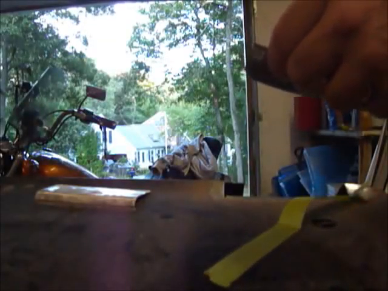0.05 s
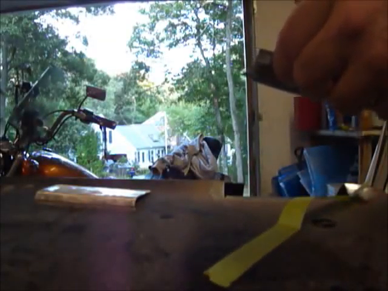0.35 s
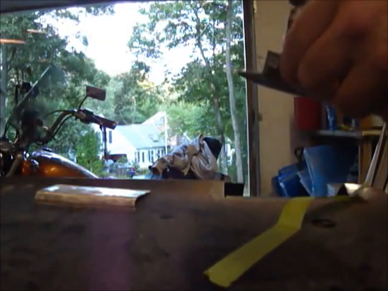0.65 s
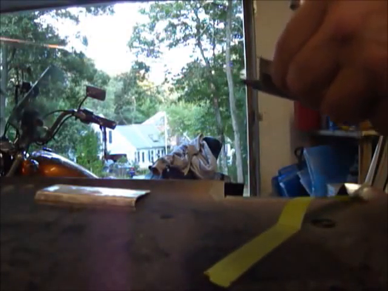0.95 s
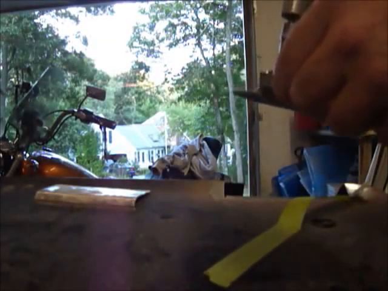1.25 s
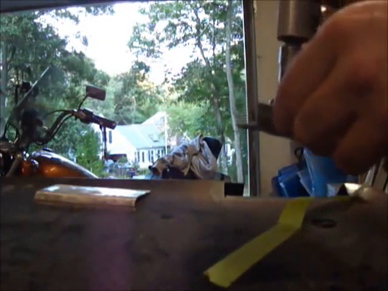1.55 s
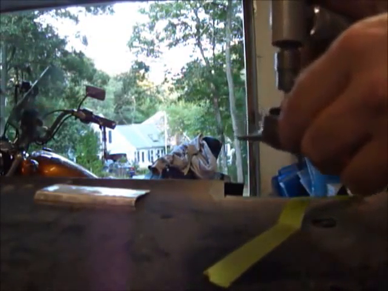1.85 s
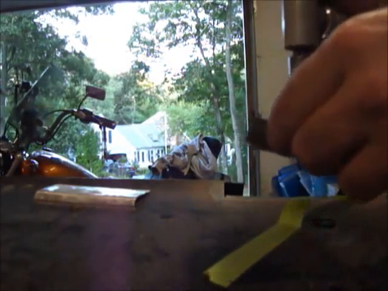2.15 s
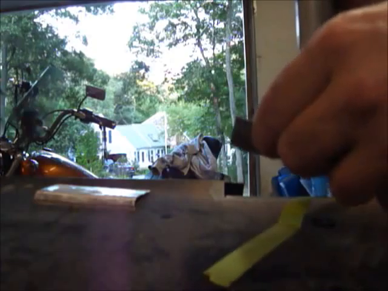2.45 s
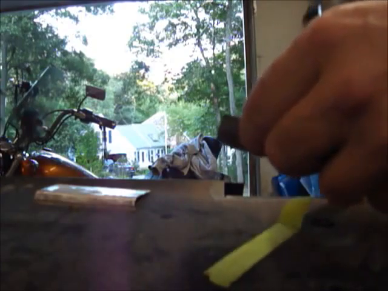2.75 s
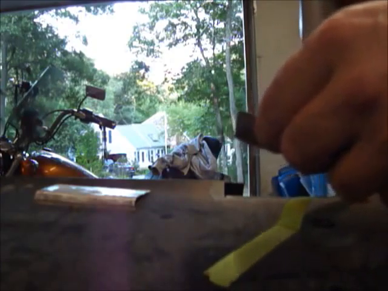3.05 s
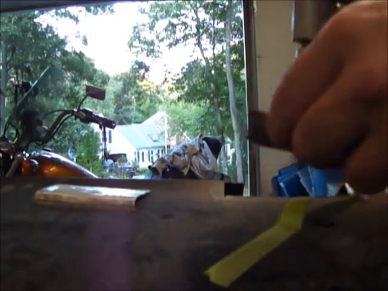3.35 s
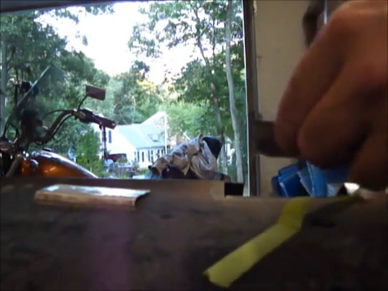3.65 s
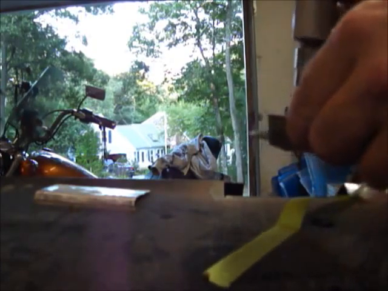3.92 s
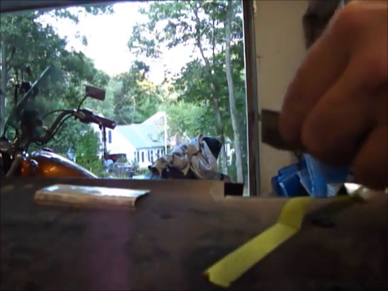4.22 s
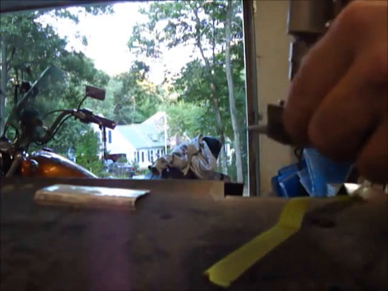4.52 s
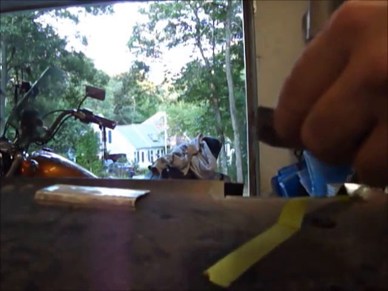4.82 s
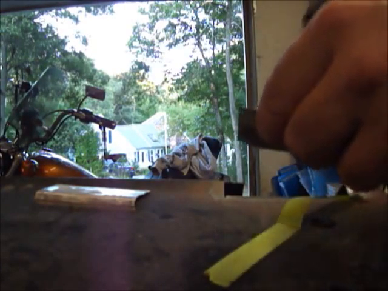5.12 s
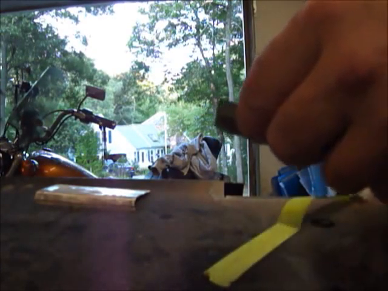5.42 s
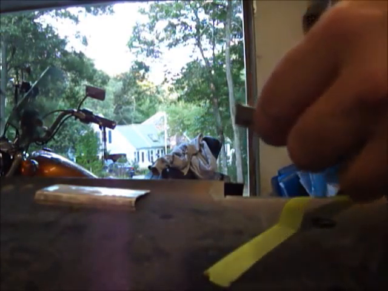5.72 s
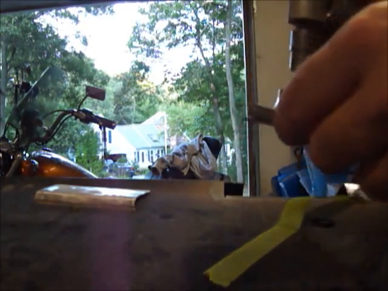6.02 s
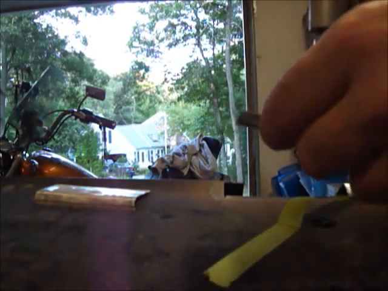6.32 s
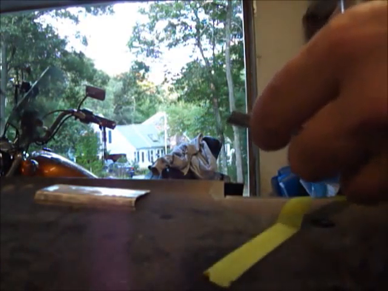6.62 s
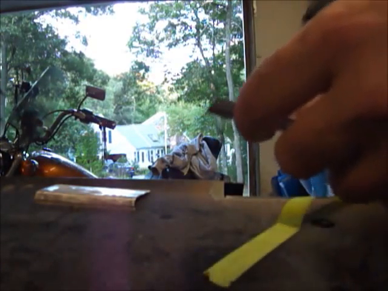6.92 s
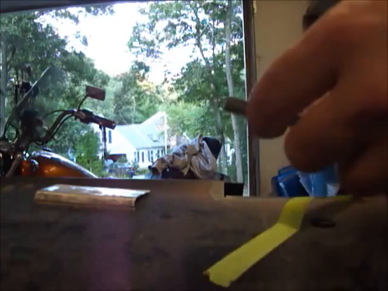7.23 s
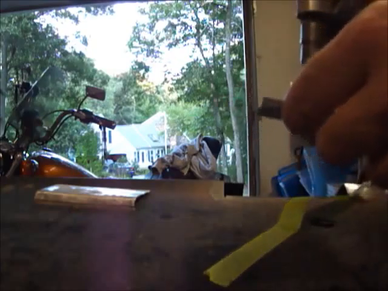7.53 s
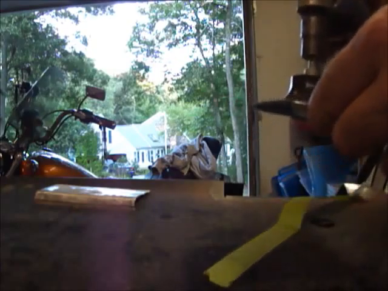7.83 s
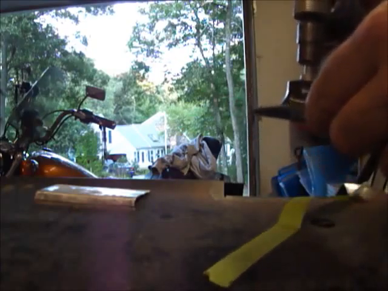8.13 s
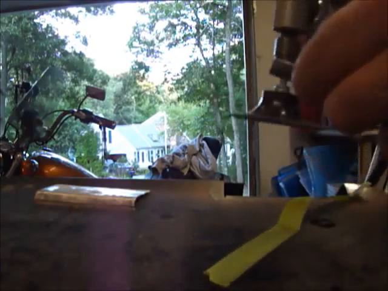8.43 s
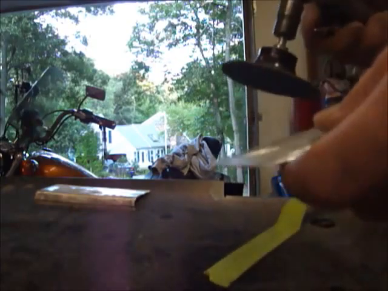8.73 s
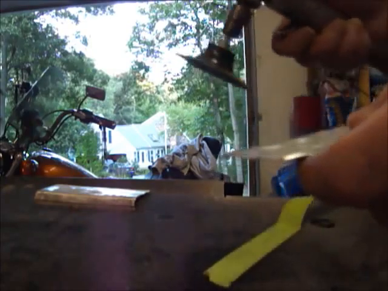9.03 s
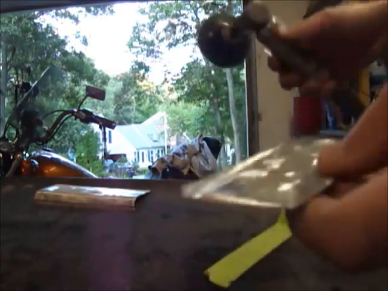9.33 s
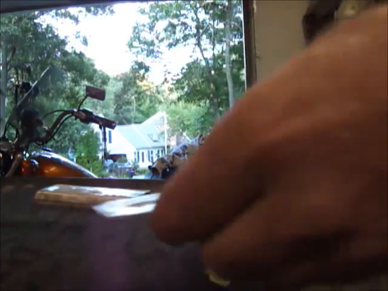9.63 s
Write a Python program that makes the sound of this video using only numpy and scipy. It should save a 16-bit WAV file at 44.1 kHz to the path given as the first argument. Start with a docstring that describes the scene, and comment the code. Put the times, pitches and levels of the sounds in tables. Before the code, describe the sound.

A small air grinder is already working sheet steel, close to the microphone in a garage with a short echo. Its high whine rises in the first second, then sags and wavers over a steady rasp, hiss and sizzle. Brief metallic squeals come and go, and exhaust air softly puffs on the microphone now and then, around 1, 2 and 4 to 6 seconds. From about 6.7 seconds the whine drops and weakens as the disc skips, making the sheet stutter, ring and squeal. A sharp knock comes at 7 seconds and a quick cluster around 7.4. At 8.5 the disc leaves the steel and the tool coasts. Near 8.9 the trigger clicks and it spins up briefly with a hiss of air, then runs down, whirring, chuffing and faintly whistling, with a tiny scrape of the sheet at about 9.6.

```python
"""An air-driven die grinder on a small piece of sheet steel, close to the microphone in a garage.
Exhaust puffs from its five vanes make a whine that sags under load. The warped disc rasps twice a turn,
rings the sheet into squeals, skips and kicks, then leaves the steel and coasts.
One short squeeze of the trigger spins it up again and it runs down, chuffing.
Exhaust air brushes the microphone now and then; behind it all lies the quiet, short-ringing room."""
import sys
import numpy as np
from scipy import signal
from scipy.fft import rfft, irfft, next_fast_len
from scipy.io import wavfile
from scipy.ndimage import uniform_filter1d, map_coordinates

SR = 44100
rng = np.random.default_rng(int(sys.argv[2]) if len(sys.argv) > 2 else 0)


def int16_out(signal):
    """Quantize to a 16-bit WAV file."""
    q = np.round(np.clip(np.atleast_2d(signal).T, -1, 1) * 32767)
    wavfile.write(sys.argv[1], SR, q.astype(np.int16))


N = 435266

# the shaft under the hand's changing load: t/s, speed/(turns/s)
LOADED_SPEED = [(0.0, 110.4), (0.16, 99.0), (0.42, 133.3), (0.64, 141.6), (0.88, 138.6), (1.11, 129.9),
                (1.35, 136.2), (1.79, 116.3), (2.11, 105.8), (2.54, 110.4), (2.92, 118.4), (3.16, 117.9),
                (3.39, 108.3), (3.88, 120.1), (4.21, 117.7), (4.5, 111.6), (5.07, 105.5), (5.23, 108.7),
                (5.52, 104.0), (5.79, 110.6), (5.98, 109.3), (6.31, 116.2), (6.51, 109.7), (6.77, 83.5),
                (7.15, 82.3), (7.32, 90.8), (7.39, 87.3), (7.91, 96.9), (8.18, 76.0), (8.37, 73.0),
                (8.5, 52.3)]
# the exhaust sounds fully only in a range of speeds: speed/(turns/s), level/dB
EXHAUST_BY_SPEED = [(8, -90), (33, -50), (46, -31), (60, -19), (75, -13), (93, -10), (103, -0.5), (132, 0),
                    (142, -2)]
# harmonics 1-3 of the vane tone: base level/dB, share of the exhaust's swing that each follows
VANE_HARMONICS = [(-25.5, 1), (-30.5, .7), (-33.5, .8)]
# the whine swells or sinks: middle t/s, length/s, change/dB of harmonics 1, 2 and 3
WHINE_SWELLS = [(.16, .1, 5, 4, 4), (.36, .16, 3, 6, 1), (.55, .26, .5, 4.5, 3), (1.25, .2, 0, 2, 0),
                (.82, .25, -1, 0, -7), (1.39, .1, 0, 0, -9), (1.65, 0.34, 1, 1, 1.5), (2.7, 1.6, -1, -1, 0),
                (4.05, .6, 2, 3.5, 1), (5.3, .5, 1.5, 1.5, 2), (6.25, .6, -3.5, -5, -6),
                (7.42, .17, -3, -4, -7), (8.3, .3, -1.5, 2.5, -2), (8.53, .14, -7, -5, -3),
                (9.12, .25, 0, -1, -4)]
# weak tones of rotor and bearings: multiple of the shaft speed, relative level/dB
ROTOR_TONES = [(1, -50.5), (2, -48), (2.5, -41.5), (3, -43.5), (4, -34), (6, -28.5), (6.2, -25), (7, -28),
               (8, -32), (8.75, -23.5), (9, -42), (11, -22), (11.2, -30), (12, -23), (13, -29), (14, -25),
               (25, -28.5), (40, -28), (50, -30)]
# the disc's bites above the steady rub, harder as it skips: t/s, high side/dB, opposite side/dB
DISC_BITES = [(0, 4, 0), (1.8, 3.5, 1.5), (1.9, 13, 3), (2.2, 3.5, 1.5), (6.12, 4.5, 1), (6.23, 10, 1),
              (6.38, 3.5, 0), (6.8, 15, 1), (7.05, 15, 3), (7.17, 12.5, 12), (7.47, 20.5, 2),
              (7.62, 10, -3), (7.77, 10, 0), (7.86, 7.5, 8.5), (8.17, 10, 9.5), (8.26, -1.5, 8.5),
              (8.5, 1, 10)]
# base levels of the grinding: t/s, rasp/dB, hiss/dB, sizzle/dB
GRIND_LEVELS = [(0.0, -30.5, -34.5, -35.9), (0.59, -31, -30, -33.5), (0.77, -36, -35, -39),
                (1.31, -33, -33, -36), (1.42, -34, -35.0, -38.5), (1.77, -30.5, -32, -32),
                (1.9, -37.7, -33.2, -30), (2.21, -32.5, -36, -37.2), (4.14, -29.7, -32.6, -32.0),
                (4.88, -32.1, -32.4, -34.5), (5.16, -30, -34.5, -32.5), (6.12, -32, -33.9, -35.5),
                (6.24, -28, -30, -31), (6.34, -34, -35.0, -37.7), (6.55, -35, -35.5, -29.7),
                (6.74, -35.4, -33.5, -32), (7.42, -36, -37.5, -28), (7.66, -42.7, -32.1, -38),
                (7.81, -37.9, -36.2, -40), (7.88, -36.2, -33.4, -29.5), (8.05, -34.5, -36.5, -37.2),
                (8.43, -39, -34, -33.5), (8.5, -40.5, -43, -38)]
# the hand leans on the disc or eases off: middle t/s, length/s, change/dB
HAND_PRESSES = [(.26, .04, 3), (.89, .08, 2.5), (.98, .05, -2.5), (2.09, .04, -3), (2.77, .08, 2.5),
                (5.43, .05, -2.5), (5.925, .025, 5), (5.955, .03, -3), (7.565, .04, 3.5), (8.38, .14, 2),
                (8.519, .02, 3)]
# spectra of grit on steel, from low to high: f/Hz, level/dB
ROAR_SPECTRUM = [(25, -62), (70, -54), (120, -30), (260, -12), (500, -4.5), (900, -2), (1300, 2.5),
                 (1900, -2), (2600, -2.5), (5000, -16)]
RASP_SPECTRUM = [(25, -70), (300, -27), (900, -22), (1400, -0.5), (2100, 0.5), (3200, 3), (4200, 0.5),
                 (5200, -5), (7000, -50)]
HISS_SPECTRUM = [(2800, -59), (4000, -12), (4800, -3), (5900, 1), (6900, 2.5), (7700, -4), (8500, -2),
                 (10000, -50)]
SIZZLE_SPECTRUM = [(6000, -52), (7500, -19), (8200, 3.5), (9000, 6.5), (9700, 2.5), (10500, 12),
                   (11200, -4.5)]
# bending modes of the sheet: f/Hz, width/Hz, level/dB
SHEET_MODES = [(2560, 89, 4.5), (3080, 230, 5), (3223, 200, 12), (5870, 140, 4), (5930, 160, -8.5),
               (6420, 430, 0.5), (6970, 480, 0), (8000, 190, 9.5), (8960, 400, -5), (9800, 390, -14),
               (10700, 110, 9)]
# one mode takes hold and squeals: middle t/s, length/s, f/Hz, relative level/dB
SHEET_SQUEALS = [(.9, .32, 5400, 0), (1.35, 0.3, 4770, -1), (1.94, .11, 6500, -5), (4.2, .9, 9100, -8),
                 (5.39, 0.12, 10210, 1), (5.57, .11, 2680, -1), (6.22, .17, 3200, -2), (6.236, .3, 2650, 0),
                 (6.835, .16, 2970, 9), (6.9, .26, 6250, -3), (7.026, .15, 9000, 4), (7.173, .18, 2760, 0),
                 (7.2, .2, 10200, 6), (7.233, 0.13, 3300, -2), (7.39, 0.11, 8900, 7), (7.47, .1, 10700, 6),
                 (7.567, 0.05, 9000, 4), (7.664, .16, 7900, 3), (7.717, .22, 7100, -2), (7.6, .25, 2600, 0),
                 (7.865, .2, 2480, 0), (7.93, .18, 9000, -5), (8.03, .14, 4400, -1), (8.34, 0.09, 7920, 1),
                 (8.35, .12, 7150, -2), (8.37, .14, 10950, -1), (7.89, .12, 10850, -3),
                 (1.87, .18, 10440, -5), (1.99, .15, 9040, -6), (6.82, .2, 10400, -5),
                 (1.77, .08, 3250, -2), (6.24, .12, 4950, -5), (6.983, .12, 6540, -1)]
# the disc's edge kicks the sheet: t/s, peak level/dB, treble corner/Hz
DISC_KICKS = [(7.0394, -7.5, 3000), (7.3459, -8.5, 2200), (7.379, -12, 3500), (7.4014, -8.5, 1500),
              (7.4122, -11, 2000), (7.4247, -9, 2000), (7.4695, -14, 5000)]
# the trigger and its valve click: t/s, peak level/dB, treble corner/Hz
TRIGGER_CLICKS = [(8.8934, -42, 1500), (8.9183, -24, 1500), (8.9515, -21, 9000)]
# spectrum of a kick or click ahead of its treble roll-off: f/Hz, level/dB
KNOCK_SPECTRUM = [(25, -24), (60, -13), (130, -4), (300, 2.5), (600, 2.5), (1100, -0.5), (2000, 2),
                  (2600, -5), (4300, -16), (6000, -7), (11000, -12)]
# spectra of the tool off the steel (vanes, rotor, air): f/Hz, level/dB
CHUFF_SPECTRUM = [(30, -62), (100, -38), (250, -21), (500, 0), (720, 10.5), (1000, -1), (1500, -6),
                  (2500, -20), (6000, -35)]
WHIRR_SPECTRUM = [(30, -42), (100, -40), (400, -1), (1200, -1.5), (2000, -0.5), (3000, -2), (3800, -5.5),
                  (5500, -9.5), (9000, -44)]
AIR_SPECTRUM = [(50, -37), (200, -24), (900, -0.5), (2500, -3), (4400, 1), (6500, 2), (8500, 1.5),
                (9700, 2.5), (11200, -1)]
# the free-running tool whistles: middle t/s, length/s, f/Hz, relative level/dB
FREE_WHISTLES = [(9.017, 0.17, 8530, -10), (9.3, 0.19, 4530, -9), (9.38, 0.23, 10540, -4.5),
                 (9.56, 0.12, 2980, 0.5)]
# the sheet scrapes as it is moved away: middle t/s, length/s, level/dB
SHEET_SCRAPES = [(9.642, .014, -40)]
# exhaust air brushes the microphone while the whine dips: middle t/s, length/s, level/dB, dip/dB
MIC_PUFFS = [(0.78, .11, -47, -5.5), (0.972, 0.029, -42, -3.5), (1.866, 0.08, -40.5, -8.5),
             (1.97, 0.16, -51, -10), (4.01, 0.066, -50, -1), (4.605, 0.078, -48.5, -0.5),
             (5.35, 0.29, -55, 0), (6.088, .08, -52, 0.5)]
# spectra of air on the microphone and of the room tone: f/Hz, level/dB
PUFF_SPECTRUM = [(25, -24), (70, -16), (100, -2), (130, 4), (250, 5.5), (450, 1), (1200, -30)]
ROOM_TONE_SPECTRUM = [(25, -16), (70, -31), (125, 3), (200, -19), (400, 3), (1200, 6), (4000, -16),
                      (11000, -24)]
# reverberation of the garage: f/Hz, time to fall 60 dB/s
GARAGE_DECAY = [(150, 0.58), (1500, 0.39), (10000, 0.07)]

VANES = 5
HIGH_SIDE_S, LIFT_OFF_S = 7.402, 8.525  # the disc's high side is on the steel; the disc lifts off
SQUEEZE_S, RELEASE_S = 8.918, 9.132  # the trigger


def shaft_speed():
    """Turns per second: the shaft labours under load, coasts, spins up on the trigger, coasts again."""
    inertia_s, coast_s, spin_up_s, valve_lag_s = .09, .4, .175, .022
    drag, unloaded = -8, 160  # turns/s the shaft heads for with the air off and on
    t = clock()
    speed = uniform_filter1d(curves(LOADED_SPEED)[0], size=int(inertia_s * SR), mode="nearest")
    for start, goal, lag in ((LOADED_SPEED[-1][0], drag, coast_s),
                             (SQUEEZE_S + valve_lag_s, unloaded, spin_up_s),
                             (RELEASE_S, drag, coast_s)):
        gap = np.interp(start, t, speed) - goal
        speed = np.where(t > start, goal + gap * np.exp(-np.maximum(t - start, 0) / lag), speed)
    return np.maximum(speed, 1)


def motor_whine(turns, speed):
    """Each vane lets out one puff a turn; unequal vanes and the bearings add weak tones."""
    muffler_hz, muffler_db_per_hz = 1793, .06
    full_air = trigger_burst(0, attack_s=.01, hold_s=RELEASE_S - SQUEEZE_S, fall_db_per_s=220)
    exhaust_db = along(EXHAUST_BY_SPEED, speed + 28.4 * full_air)  # full air sounds like more speed
    dips = [(s, length, dip) for s, length, _, dip in MIC_PUFFS]
    valve_shuts = (RELEASE_S, .014, -14)  # the whine breaks off: t/s, length/s, dip/dB
    dip_db = swells(dips + [valve_shuts]) + .6 * wobble(16)
    angle = 2 * np.pi * (turns + .0013 * wobble(70))
    levels = []
    for k, (db, share) in enumerate(VANE_HARMONICS, 1):
        swell_db = swells([(s, length, heights[k - 1]) for s, length, *heights in WHINE_SWELLS])
        muffled_db = muffler_db_per_hz * np.maximum(k * VANES * speed - muffler_hz, 0)
        waver_db = .45 * k * wobble(18) + .41 * wobble(45)
        levels.append(db + share * exhaust_db + swell_db + dip_db - muffled_db + waver_db)
    whine = sum(amp(db) * np.cos(k * VANES * angle) for k, db in enumerate(levels, 1))
    rotor = sum(amp(db + 4.7 * wobble(7)) * np.sin(order * angle + .57 * wobble(9))
                for order, db in ROTOR_TONES)
    return np.sqrt(2) * (whine + amp(levels[0] - .5) * rotor)


def grinding(turns, speed):
    """Grit tears at the steel with the contact force, until the disc lifts off."""
    pressure_db = swells(HAND_PRESSES) + .7 * wobble(16)  # the hand is unsteady
    rasp_db, hiss_db, sizzle_db = (db + pressure_db + .6 * wobble(16) for db in curves(GRIND_LEVELS))
    skip_db = uniform_filter1d(np.maximum(*curves(DISC_BITES)), size=SR // 5)
    freedom = np.clip((skip_db - 2) / 24, 0, .9)  # a skipping disc leaves the sheet free to ring
    force = contact_force(turns, width_turns=.16) * amp(.57 * wobble(60) + 1.05 * wobble(1500))
    squeals = SHEET_SQUEALS + faint_squeals(freedom)
    low, middle, high = ([row for row in squeals if low_hz <= row[2] < high_hz]
                         for low_hz, high_hz in ((0, 4800), (4800, 8400), (8400, SR)))
    roar = amp(rasp_db - 7) * noise(ROAR_SPECTRUM)
    # coarse grit repeats from turn to turn as a buzz; fine grit wears faster
    rasp = coloured(turning_noise(turns, repeat=.76, wear_turns=20, patchy_db=1.8), RASP_SPECTRUM)
    hiss = coloured(turning_noise(turns, repeat=.34, wear_turns=7.8, patchy_db=1.07), HISS_SPECTRUM)
    sizzle = coloured(turning_noise(turns, repeat=.35, wear_turns=8.9, patchy_db=1.4), SIZZLE_SPECTRUM)
    rasp = squealing(sheet_ring(rasp, .3 * freedom), low, speed, width_hz=450, glide=.73)
    hiss = squealing(sheet_ring(hiss, freedom), middle, speed, width_hz=550, glide=.29)
    sizzle = squealing(sheet_ring(sizzle, .35 * freedom), high, speed, width_hz=680, glide=.19)
    rub = roar + amp(rasp_db + .24) * rasp + amp(hiss_db - .9) * hiss + amp(sizzle_db + .9) * sizzle
    touching = np.clip((LIFT_OFF_S - clock()) / .0059, 0, 1)
    return touching * force * rub


def contact_force(turns, width_turns, smooth_s=.012):
    """A steady rub plus a bite from each side of the warped disc, held near unit power."""
    high_db, opposite_db = curves(DISC_BITES)
    power = 1.
    for db, offset_turns in ((high_db, 0), (opposite_db, .43)):
        away = (turns - offset_turns + .5) % 1 - .5
        bite = np.exp(-np.abs(away / width_turns) ** 3)
        power = power + (amp(np.maximum(db, 0)) ** 2 - 1) * bite
    pole = np.exp(-1 / (smooth_s * SR))
    return np.sqrt(power / signal.filtfilt([1 - pole], [1, -pole], power))


def turning_noise(turns, repeat, wear_turns, patchy_db, per_turn=320):
    """Noise of a rough wheel: the share `repeat` comes round again each turn as it wears away."""
    fresh, grit, patches = rng.standard_normal((3, 4 * per_turn, per_turn))
    partials = rfft(signal.lfilter([1], [1, -np.exp(-1 / wear_turns)], grit, axis=0))
    buzz = unit(irfft(partials / np.abs(partials) ** .4))  # no partial stands far above the rest
    track = (np.sqrt(repeat) * buzz + np.sqrt(1 - repeat) * fresh).ravel()
    # patches of colour last some turns and glide with the speed
    spectra = signal.stft(track, nperseg=per_turn)[2]
    patches = uniform_filter1d(np.resize(patches, spectra.shape[::-1]), size=30, axis=0)
    patches = uniform_filter1d(patches, size=5, axis=1)
    track = signal.istft(spectra * amp(patchy_db * unit(patches).T), nperseg=per_turn)[1]
    return unit(map_coordinates(track, [(turns - turns[0] + 20) * per_turn], mode="wrap"))


def sheet_ring(rub, freedom):
    """The rub rings the sheet's bending modes, the more the freer the sheet is between bites."""
    def response(hz):
        modes = sum((-1) ** k * amp(db) * 1j * hz * width / (mode_hz ** 2 - hz ** 2 + 1j * hz * width)
                    for k, (mode_hz, width, db) in enumerate(SHEET_MODES))
        return 1j * modes + .16 * (hz < 2000)
    return np.sqrt(1 - freedom) * rub + np.sqrt(freedom) * unit(filtered(rub, response))


def squealing(x, squeals, speed, width_hz, glide):
    """Each squeal draws the power of x into a narrow band whose pitch follows speed ** glide."""
    before, out = running_power(x), x.copy()
    narrow = signal.butter(2, width_hz / 2, fs=SR)
    for s, length, hz, db in squeals:
        span = np.arange(max(0, int((s - 1.5 * length) * SR)), min(N, int((s + 1.5 * length) * SR)))
        swell = np.exp(-2 * ((span / SR - s) / length) ** 2)
        pitch_hz = hz * (speed[span] / speed[int(s * SR)]) ** glide
        carrier = np.exp(2j * np.pi * np.cumsum(pitch_hz) / SR)
        rms = np.sqrt(before[span])
        band = (signal.filtfilt(*narrow, x[span] / rms / carrier) * carrier).real
        out[span] += amp(db - 2.5) * swell * unit(band) * rms
    return out * np.sqrt(before / running_power(out))


def faint_squeals(freedom, count=18, length_s=.18):
    """Rows of chance squeals on any of the sheet's modes, louder when it rings freely."""
    draws = rng.random((count, 2)) * (LIFT_OFF_S, len(SHEET_MODES))
    return [(s, length_s, SHEET_MODES[int(mode)][0], -15 + 14 * freedom[int(s * SR)])
            for s, mode in draws]


def knocks(blows, size=2048):
    """Each kick or trigger click is one sharp push with its own level and brightness."""
    out = np.zeros(N + SR)
    hz = np.fft.rfftfreq(size, 1 / SR)
    for s, db, corner_hz in blows:
        gain = amp(along(KNOCK_SPECTRUM, hz)) / np.hypot(1, hz / corner_hz)
        cepstrum = irfft(np.log(gain))[:size // 2]
        push = irfft(np.exp(2 * rfft(cepstrum, size)))  # minimum phase: the energy comes first
        push = push - .25 * np.pad(push, (SR // 2000, 0))[:size]  # swings back after half a millisecond
        out[round(s * SR):][:size] += amp(db) * push / np.abs(push).max()
    return out[:N]


def free_run(turns, speed):
    """Off the steel the vanes chuff through the exhaust, the rotor whirrs and the air hisses."""
    decades = np.log10(speed / 50)  # tenfold steps from 50 turns/s
    coasting = amp(-50.5 + 10.5 * decades)
    looseness = .7 / (speed + 5) * wobble(200)  # slow vanes fall unevenly and rattle
    vane = np.floor(VANES * (turns + looseness))
    puffs = np.diff(vane, prepend=vane[0]) * amp(3.2 * rng.standard_normal(N)) / np.sqrt(speed + 1)
    merged_db = .1 * np.maximum(speed - 60, 0)  # at speed the chuffs merge into the whine
    chuff = amp(-41.5 + 33 * decades - merged_db) * coloured(puffs, CHUFF_SPECTRUM)
    sliding = turning_noise(turns, repeat=.43, wear_turns=6, patchy_db=-.5) * (speed / 110)
    sliding += .56 * rng.standard_normal(N)
    whirr_gain = coasting + trigger_burst(-33.5, attack_s=.1, hold_s=.55, fall_db_per_s=52)
    whirr = whirr_gain * amp(1.8 * wobble(250)) * coloured(sliding, WHIRR_SPECTRUM)
    air_gain = coasting + trigger_burst(-25, attack_s=.035, hold_s=.15, fall_db_per_s=56)
    air = air_gain * amp(1.7 * wobble(300)) * noise(AIR_SPECTRUM)
    whistling = squealing(whirr + air, FREE_WHISTLES, speed, width_hz=1040, glide=0)
    return (clock() > LIFT_OFF_S) * (chuff + whistling)


def trigger_burst(db, attack_s, hold_s, fall_db_per_s):
    """A gain that rises, holds and falls from the moment of the squeeze."""
    age = np.maximum(clock() - SQUEEZE_S, 0)
    return (1 - np.exp(-age / attack_s)) * amp(db - fall_db_per_s * np.maximum(age - hold_s, 0))


def sheet_scrape():
    """A short dry rasp of the sheet in the hand."""
    return swells([(s, length, amp(db)) for s, length, db in SHEET_SCRAPES]) * noise(WHIRR_SPECTRUM)


def air_on_microphone():
    """Exhaust air reaches the close microphone as soft low puffs."""
    swell = swells([(s, length, amp(db)) for s, length, db, _ in MIC_PUFFS])
    return swell * amp(1.2 * wobble(100)) * noise(PUFF_SPECTRUM)


def garage(x):
    """The walls answer 5 ms after the direct sound; the treble dies first."""
    hz, t, spectra = signal.stft(rng.standard_normal(SR // 2), SR, nperseg=256)
    decay = amp(-60 * t / along(GARAGE_DECAY, hz)[:, None])
    tail = signal.istft(spectra * decay, SR, nperseg=256)[1]
    return signal.fftconvolve(np.pad(x, (SR // 200, 0)), tail / np.linalg.norm(tail))[:N]


def amp(db):
    """Decibels to gain."""
    return 10 ** (np.asarray(db) / 20)


def unit(x):
    """Scale to rms 1."""
    return x / np.sqrt(np.mean(x ** 2) + 1e-20)


def running_power(x):
    """Mean square over 50 ms."""
    return np.abs(uniform_filter1d(x * x, size=SR // 20)) + 1e-12


def along(points, hz):
    """Interpolate (f/Hz, value) points on a log axis."""
    f, values = np.transpose(points)
    return np.interp(np.log(hz + 1), np.log(f + 1), values)


def clock():
    """The time of each sample."""
    return np.arange(N) / SR


def curves(rows):
    """One value per sample for each column after the time."""
    s, *columns = np.transpose(rows)
    return [np.interp(clock(), s, column) for column in columns]


def swells(rows):
    """Sum of bell-shaped swells: middle t/s, length/s, height."""
    t = clock()
    return sum(height * np.exp(-np.minimum((2 * (t - s) / length) ** 2, 50))
               for s, length, height in rows)


def wobble(rate):
    """A smooth random curve, `rate` knots a second."""
    return map_coordinates(rng.standard_normal(int(N * rate / SR) + 4), [clock() * rate])


def filtered(x, response):
    """x through a frequency response."""
    size = next_fast_len(N + SR // 2)
    return irfft(rfft(x, size) * response(np.fft.rfftfreq(size, 1 / SR)), size)[:N]


def coloured(x, spectrum):
    """x shaped by a spectrum, at rms 1."""
    return unit(filtered(x, lambda hz: amp(along(spectrum, hz))))


def noise(spectrum):
    """Fresh noise with this spectrum, at rms 1."""
    return coloured(rng.standard_normal(N), spectrum)


def scene():
    """One shaft drives whine, grinding and run-down at the microphone, the garage well behind."""
    speed = shaft_speed()
    turns = np.cumsum(speed) / SR
    turns -= np.interp(HIGH_SIDE_S, clock(), turns)
    whine = motor_whine(turns, speed)
    work = grinding(turns, speed) + free_run(turns, speed)
    work += sheet_scrape() + knocks(DISC_KICKS + TRIGGER_CLICKS)
    reverb = amp(-15) * garage(work + whine / 2)
    puffs = air_on_microphone()
    room_tone = amp(-61.5) * noise(ROOM_TONE_SPECTRUM)
    return (whine + work + reverb + puffs + room_tone)[None]


def record(dry):
    """One microphone channel, cut off steeply at the top of its band."""
    top_hz, edge_hz = 11130, 100
    return filtered(dry[0], lambda hz: np.clip((top_hz - hz) / edge_hz + .5, 0, 1))[None]


dry = scene()
out = record(dry)
int16_out(out)
```